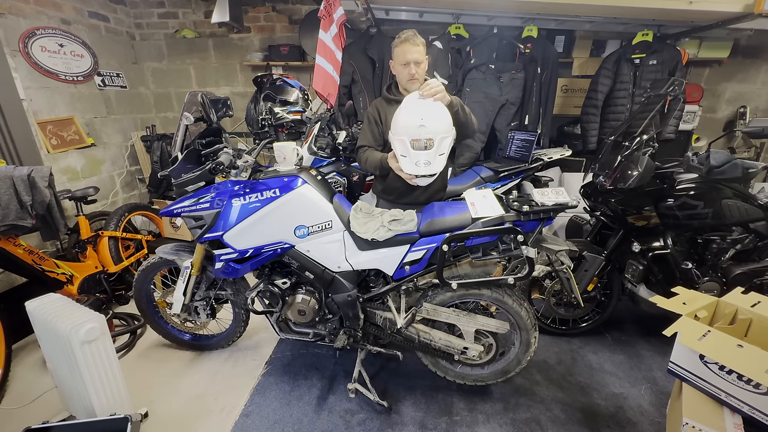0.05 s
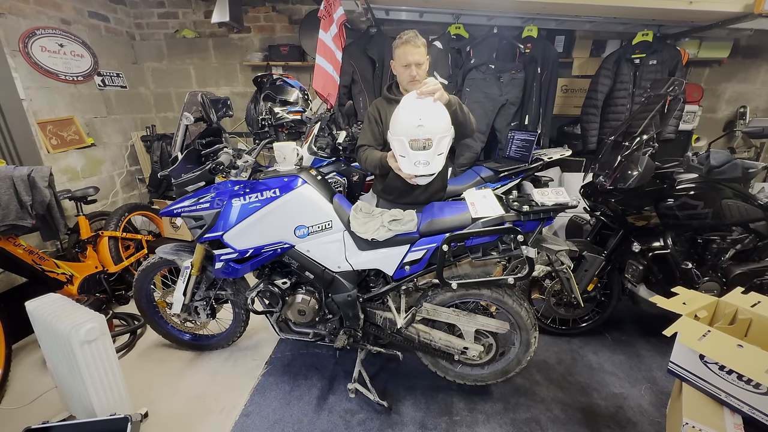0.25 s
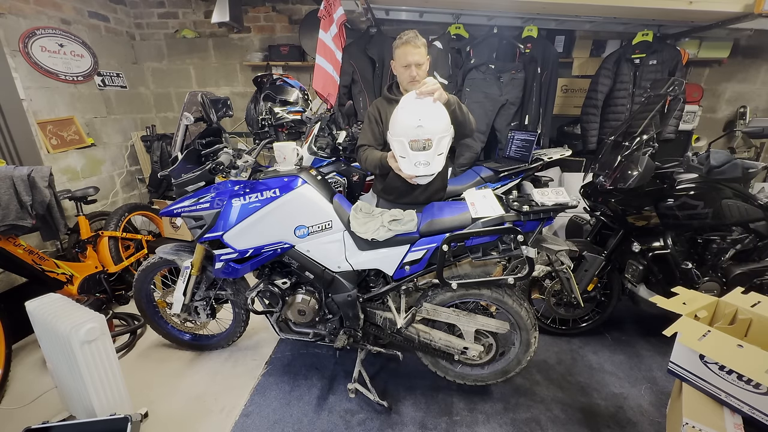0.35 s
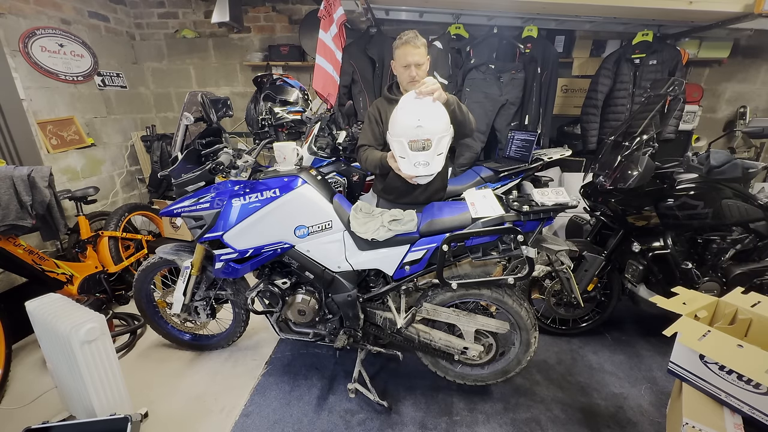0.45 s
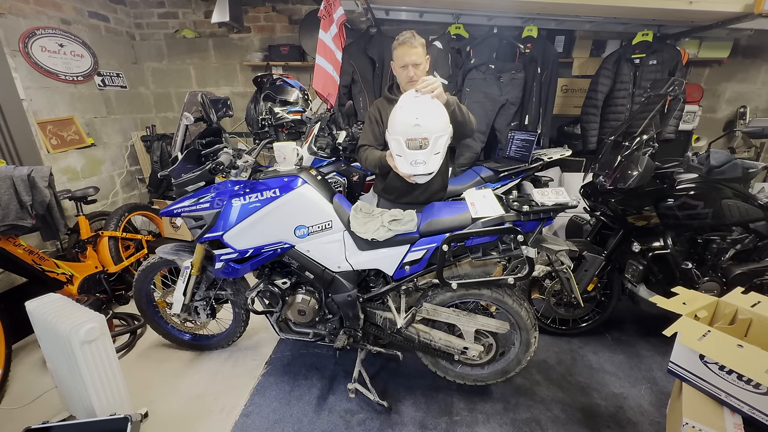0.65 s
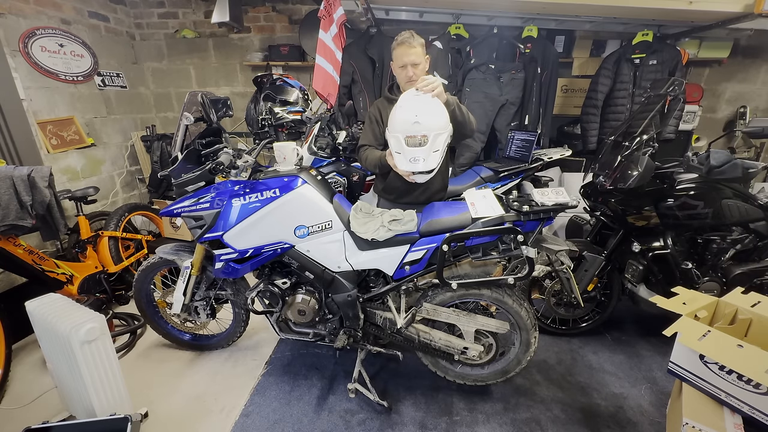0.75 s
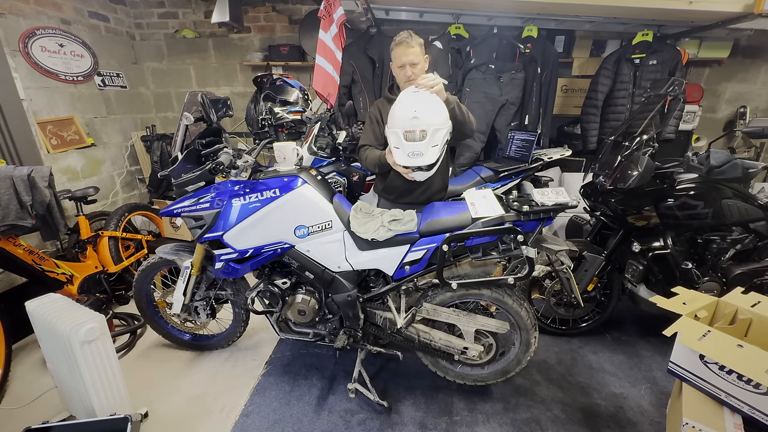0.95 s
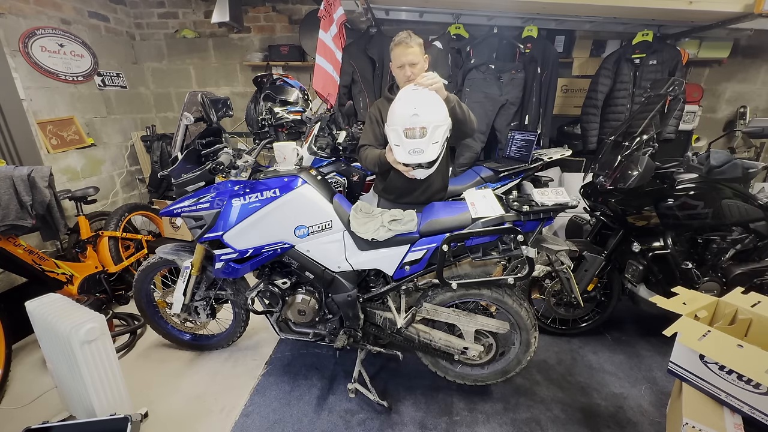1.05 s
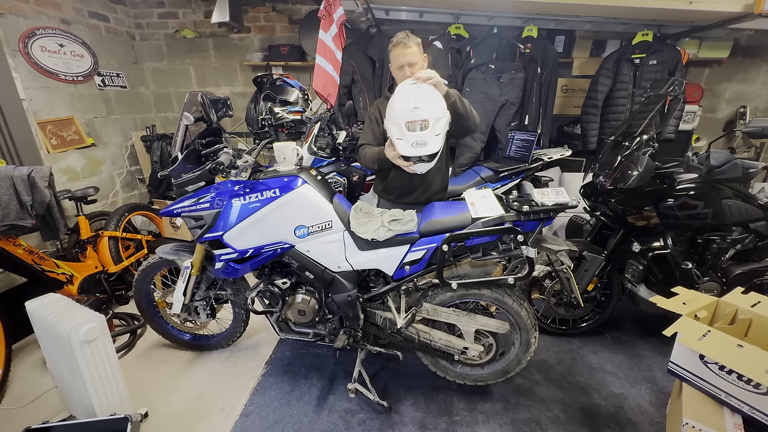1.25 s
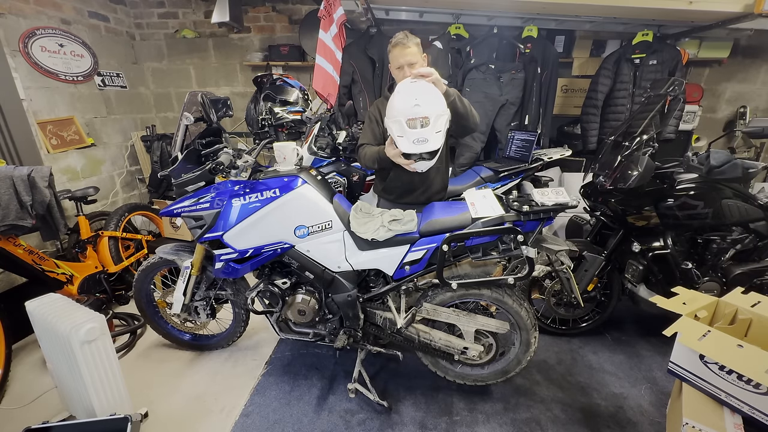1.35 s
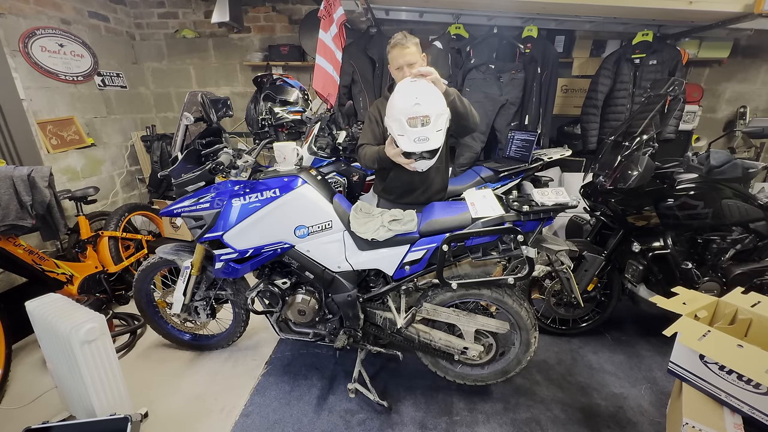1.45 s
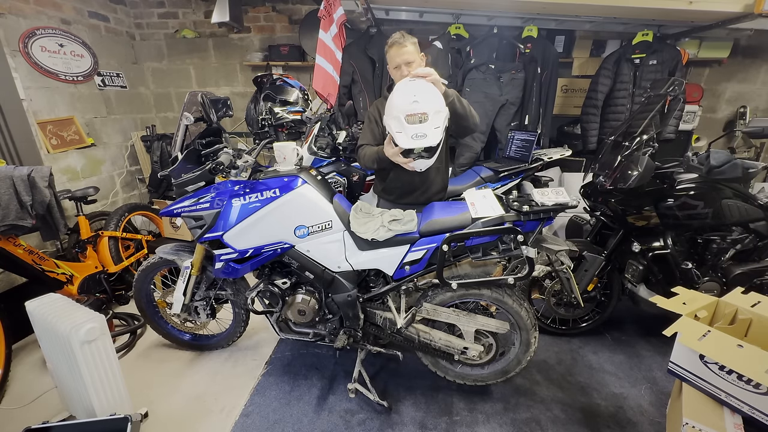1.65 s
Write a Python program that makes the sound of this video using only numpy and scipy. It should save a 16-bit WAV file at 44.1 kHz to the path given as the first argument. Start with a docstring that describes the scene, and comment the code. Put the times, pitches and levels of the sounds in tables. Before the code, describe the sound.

Helmet parts snap into place three times, with light plastic knocks and scrapes between.

```python
"""Plastic parts of a helmet are pressed home by hand in a cluttered garage, a few metres away.
Over low rumble and faint hiss, the parts rub, creak and squeak until the first catch snaps at 0.25 s.
Light knocks and scrapes lead to a second snap at 0.83 s, sharper ones to a third at 1.39 s.
Each snap is a cluster of impacts that excite the part's resonances, with a hollow thump beneath;
nearby clutter scatters every click, and a short room tail follows."""
import sys
import numpy as np
from scipy import signal
from scipy.fft import rfft, irfft, next_fast_len
from scipy.io import wavfile
from scipy.ndimage import uniform_filter1d

SR = 44100
rng = np.random.default_rng(int(sys.argv[2]) if len(sys.argv) > 2 else 0)


def generate_wav(sig):
    """Save sig (samples, or channels by samples) to the path in sys.argv[1] as 16-bit PCM at SR."""
    pcm = np.round(np.clip(np.atleast_2d(sig).T, -1, 1) * 32767).astype(np.int16)
    wavfile.write(sys.argv[1], SR, pcm)


N = 74970


def undb(db):
    """Amplitude ratio of a level in decibels."""
    return 10 ** (np.asarray(db) / 20)


def unit(x):
    """Normalisation to unit rms."""
    return x / np.sqrt(np.mean(x ** 2))


def since(start):
    """Time in seconds since an onset, zero before it."""
    return np.maximum(np.arange(N) / SR - start, 0)


def decay(age, attack, t60):
    """Build-up and exponential damping: an envelope of unit energy."""
    env = (1 - np.exp(-age / max(attack, 1 / SR))) * np.exp(-np.log(1000) * age / t60)
    return env / np.linalg.norm(env)


def friction(peak, rise, fall):
    """Friction noise, mid and side, growing exponentially to a peak and dying away."""
    t = np.arange(N) / SR
    return np.exp(-np.maximum((peak - t) / rise, (t - peak) / fall)) * rng.standard_normal((2, N))


def colour(x, spectrum, modes=(), tilt_db=0):
    """Minimum-phase filter of unit power: Lorentzian peaks on a spectrum tilted above 1500 Hz."""
    size = 2 * next_fast_len(N // 2 + SR // 10)
    f = np.maximum(np.arange(size // 2 + 1) * SR / size, 1)
    hz, db = np.array(spectrum).T
    gain = undb(np.interp(np.log(f), np.log(hz), db) + tilt_db * np.log2(np.maximum(f, 1500)))
    peaks = sum(undb(level) ** 2 / (1 + (2 * np.pi * (f - centre) * t60 / np.log(1000)) ** 2)
                for centre, t60, level in modes)
    cepstrum = irfft(np.log(unit(gain * np.sqrt(1 + peaks))))
    cepstrum[1:size // 2] *= 2  # folding the cepstrum makes the response causal
    cepstrum[size // 2 + 1:] = 0
    return irfft(rfft(x, size) * np.exp(rfft(cepstrum)))[..., :N]


def stereo(pair, bass_db, treble_db, pan_db=-1):
    """Sum and difference of mid and side give left and right; side gain is set at 100 and 5000 Hz."""
    f = np.arange(N // 2 + 1) * SR / N
    side_db = np.interp(np.log(f + 1), np.log([100, 5000]), [bass_db, treble_db])
    side = irfft(rfft(pair[1]) * undb(side_db), N)
    return np.array([pair[0] + side, pair[0] - side]) * undb([[pan_db / 2], [-pan_db / 2]])


def click(start, attack, t60):
    """Impulse response, mid and side: direct sound, ringing and scatter, then duller reverberation."""
    age = since(start)
    early, late = rng.standard_normal((2, 2, N))
    damping_hz = 11400
    pole = np.exp(-2 * np.pi * damping_hz / SR)
    tail = signal.lfilter([1 - pole], [1, -pole], late) * decay(age, attack=.0092, t60=.17)
    pair = early * decay(age, attack, t60) + undb(-3.5) * tail
    pair[0, int((start + attack) * SR)] += .2  # direct spike
    return pair


def catches():
    """Impact excitation: each catch slips home in a few contacts that ring its own normal modes."""
    # contacts (t/s, level/dB, catch number, T60/s, tilt/(dB per octave))
    contacts = [(0.2445, 9.5, 0, .02, 3.5), (0.2471, 10, 0, 0.045, 1.5), (0.256, 9.5, 0, 0.044, -.5),
                (0.2625, 7, 0, .06, 0), (0.2712, 8.5, 0, 0.039, 0), (0.8339, 7.5, 1, 0.085, 1),
                (0.8397, 7.5, 1, .025, 1), (0.8500, -1, 1, 0.061, -1), (1.391, 7, 2, 0.026, .5),
                (1.3929, 13, 2, 0.039, 0), (1.3999, 5.5, 2, 0.07, 0.5)]
    # spectral envelope of each catch (f/Hz, level/dB)
    spectra = [
        [(120, -45), (200, -21), (360, -15), (659, -20), (933, -10.5), (1080, -21), (1180, -8), (1370, -7),
         (1500, -5.5), (2170, -10), (2910, -2), (3250, -8.5), (4040, -5), (6400, -7.5), (9230, -7),
         (16000, -19)],
        [(120, -46), (200, -19), (696, -24), (1180, -7.5), (2210, -15), (3370, -4.5), (4350, -8.5), (5040, -2),
         (7540, -10.5), (9400, -3), (10500, -16), (16000, -18.5)],
        [(120, -41.5), (200, -22), (532, -25.5), (939, -13), (1100, -13), (1180, -5), (1410, -12), (1660, -2.5),
         (2370, -9), (2680, -6), (2880, -7), (6640, -9.5), (7250, -11.5), (8210, -8.5), (14000, -20.5)],
    ]
    # modes of each catch (f/Hz, T60/s, level/dB re envelope)
    modes = [
        [(924, .06, 2), (1204, 0.039, 8), (1340, 0.047, 7.5), (1397, 0.09, 8.5), (1732, .14, 6),
         (2910, 0.065, -2), (3602, 0.088, 7), (4173, .07, 8.5), (4950, 0.079, 9), (7410, .025, 4.5)],
        [(820, 0.043, 9), (1180, 0.032, -4), (1464, 0.048, 9.5), (1803, 0.034, 12), (2780, .06, -3),
         (3220, 0.031, 0), (3663, .05, 5), (4853, .04, 8.5), (5130, 0.052, 4), (5680, 0.074, -10),
         (6400, .05, 2.5), (9240, 0.025, 4.5)],
        [(754, 0.0257, 2), (1180, 0.044, -4.5), (1322, 0.048, 3), (1556, 0.058, 6.5), (1698, 0.043, 7),
         (2078, .07, 5.5), (2780, .06, 5), (3006, 0.035, 2.5), (4790, 0.016, 4), (6030, .03, -3),
         (9060, 0.0096, 7.5)],
    ]
    # stereo image of each catch (bass side level/dB, treble side level/dB, left minus right/dB)
    places = [(-17.5, -14.5, -2), (-7.5, -3.5, -1.6), (-9.5, -3.5, -1.55)]
    out = 0
    for start, db, catch, t60, tilt in contacts:
        impact = click(start, attack=.00077, t60=t60)
        ringing = colour(impact, spectra[catch], modes[catch], tilt)
        out = out + undb(db) * stereo(ringing, *places[catch])
    return out


def thumps():
    """Low resonance: the hollow helmet booms in the room, building slowly and outlasting each snap."""
    # thump onsets (t/s, level/dB)
    onsets = [(0.249, -11), (0.839, -14.5), (1.393, -12.5)]
    # spectral envelope of the boom (f/Hz, level/dB)
    spectrum = [(50, -18), (110, 2.5), (170, -6), (260, -4.5), (420, -23), (1500, -61.5)]
    env = sum(undb(db) * decay(since(start), attack=.02, t60=.23) for start, db in onsets)
    boom = colour(env * rng.standard_normal((2, N)), spectrum)
    return stereo(boom, bass_db=-14, treble_db=-12)


def knocks():
    """Damped free vibration: fingers and loose parts nudge the shell; the softest touches are duller."""
    # touches (t/s, level/dB, attack/s, tilt/(dB per octave))
    touches = [(0.607, -31, 0.0032, -17), (0.6564, -26.5, 0.0012, -6), (0.73, -35, .001, -6.5),
               (1.2529, -22, .004, 2.5), (1.3353, -5, .0008, -3), (1.3405, -9, .002, 2)]
    # spectral envelope of the shell (f/Hz, level/dB)
    spectrum = [(300, -27.5), (550, -29), (800, -19.5), (1150, -13), (1500, 0), (2100, -7.5), (2600, -15.5),
                (3600, -10), (5900, -15), (7000, -25), (8300, -15), (11000, -22), (15000, -32.5)]
    # modes of the shell (f/Hz, T60/s, level/dB re envelope)
    modes = [(1445, 0.054, 12.5), (1540, 0.079, 2), (1758, 0.03, 7), (2100, .035, 9)]
    pair = sum(undb(db) * colour(click(start, attack, t60=.066), spectrum, modes, tilt)
               for start, db, attack, tilt in touches)
    return stereo(pair, bass_db=-5, treble_db=-5)


def rubs():
    """Sliding friction: plastic scrapes on plastic, and bursts of noise drive the parts' modes."""
    # scrapes (peak t/s, rise/s, fall/s, level/dB, tilt/(dB per octave))
    scrapes = [(0.167, .0015, .018, -48.5, 0.5), (0.201, .005, 0.01, -54, -1.5),
               (0.53, 0.013, .04, -57.5, 3.5), (0.756, .005, 0.032, -60.5, -2.5),
               (1.201, 0.026, .018, -54.5, 4.5), (1.264, 0.0057, .015, -54.5, 1.5),
               (1.345, 0.012, 0.066, -42.5, 5.5)]
    # spectral envelope of sliding (f/Hz, level/dB)
    spectrum = [(300, -28.5), (900, 14.5), (1800, 1), (3000, -6.5), (5000, -3), (8000, -4), (11000, -17),
                (15000, -27)]
    # modes of the sliding parts (f/Hz, T60/s, level/dB re envelope)
    modes = [(2120, 0.024, 16.5), (3000, 0.013, 10.5), (4840, .01, -3.5)]
    pair = sum(undb(db) * colour(friction(peak, rise, fall), spectrum, modes, tilt)
               for peak, rise, fall, db, tilt in scrapes)
    return stereo(pair, bass_db=-18, treble_db=-10.5)


def creak():
    """Friction under load: the first catch creaks as it starts to slide."""
    # spectral envelope of the creak (f/Hz, level/dB)
    spectrum = [(400, -17), (1300, -4.5), (2500, -10), (7000, -4.5), (8500, -22), (15000, -22.5)]
    # modes of the loaded catch (f/Hz, T60/s, level/dB re envelope)
    modes = [(3730, 0.0061, 14.5), (6400, 0.0083, 9.5), (6770, .015, 5)]
    slip = undb(-35) * friction(peak=.231, rise=.0015, fall=.02)
    return stereo(colour(slip, spectrum, modes), bass_db=-19, treble_db=-24, pan_db=3.5)


def squeak():
    """Stick-slip oscillation: a tiny wavering tone just before the first catch gives."""
    pitch_hz, wobble_hz, peak_s, width_s = 7000, 100, .239, .0021
    wobble = unit(uniform_filter1d(rng.standard_normal(N), size=40))
    phase = 2 * np.pi * np.cumsum(pitch_hz + wobble_hz * wobble) / SR
    env = np.exp(-.5 * ((np.arange(N) / SR - peak_s) / width_s) ** 2)
    return undb(-23) * env * unit(np.sin(phase)) * undb([[-1], [0]])  # slightly to the right


def background():
    """Ambient noise: low rumble, nearly coherent in both ears, and faint hiss, both stronger at first."""
    # spectral envelopes of the two noises (f/Hz, level/dB)
    rumble = [(13, -60), (22, -20), (40, -10), (64, 3.5), (96, -10.5), (277, -17), (335, -24.5), (398, -24),
              (460, -43), (516, -36), (700, -34.5), (910, -58), (1540, -120)]
    hiss = [(290, -32), (500, -2), (586, -9.5), (888, -2.5), (968, -3.5), (2390, -13), (2800, -14),
            (5590, -14), (13200, -13), (15500, -44)]
    # their courses in time (t/s, level/dB)
    rumble_level = [(0, -37.5), (.05, -47), (.085, -38.5), (.125, -46), (.33, -49), (.42, -50), (1.7, -51)]
    hiss_level = [(0, -58), (0.221, -59.5), (0.451, -62), (1.1, -64), (1.7, -64.5)]
    out = 0
    for spectrum, course, bass_db, treble_db in ((rumble, rumble_level, -18.5, 3.5),
                                                 (hiss, hiss_level, 4, -11)):
        noise = unit(colour(rng.standard_normal((2, N)), spectrum))
        env = undb(np.interp(since(0), *np.array(course).T))
        out = out + env * stereo(noise, bass_db, treble_db)
    return out


def scene():
    """Linear superposition of snaps, handling sounds and ambient noise."""
    return catches() + thumps() + knocks() + rubs() + creak() + squeak() + background()


def record(dry):
    """Soft saturation rounds the highest peaks; a low-pass filter limits the band to 16 kHz."""
    lowpass = signal.ellip(8, .2, 80, 16000, fs=SR, output="sos")
    return signal.sosfilt(lowpass, 1.57 * np.tanh(dry / 1.442))


dry = scene()
out = record(dry)
generate_wav(out)
```